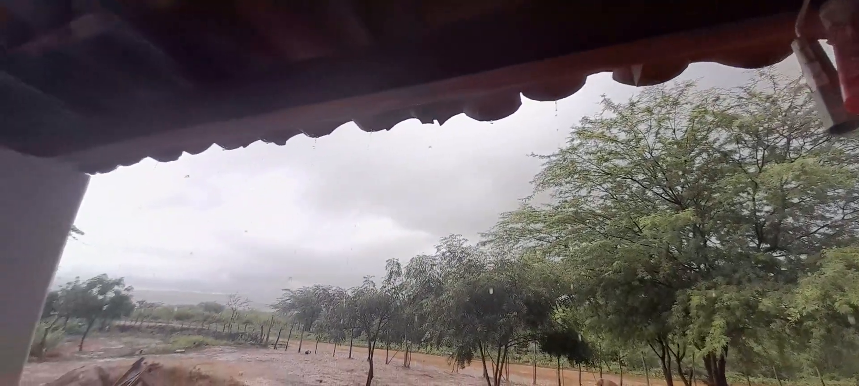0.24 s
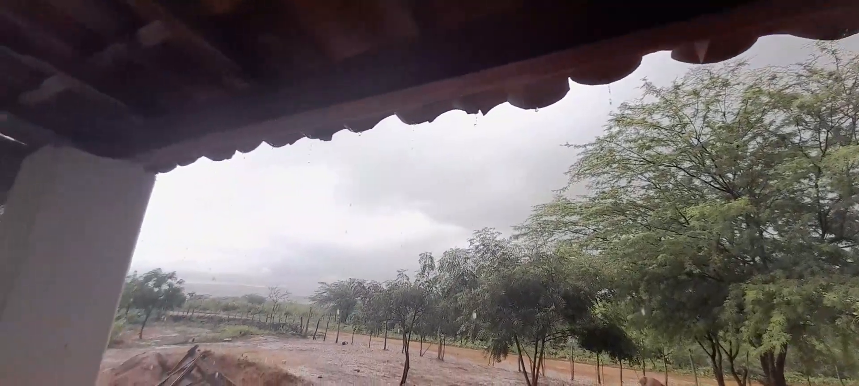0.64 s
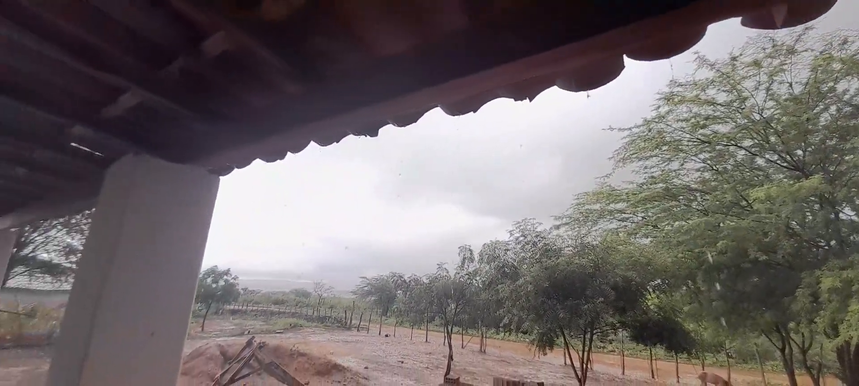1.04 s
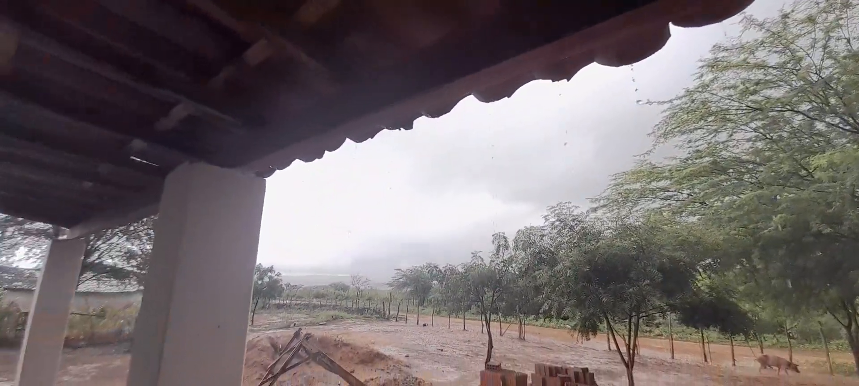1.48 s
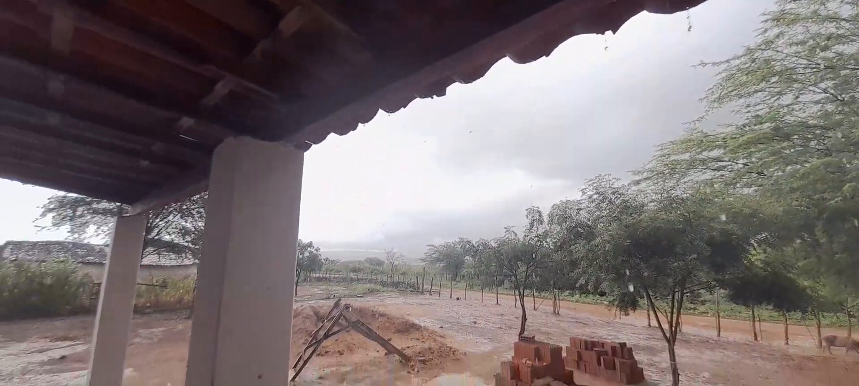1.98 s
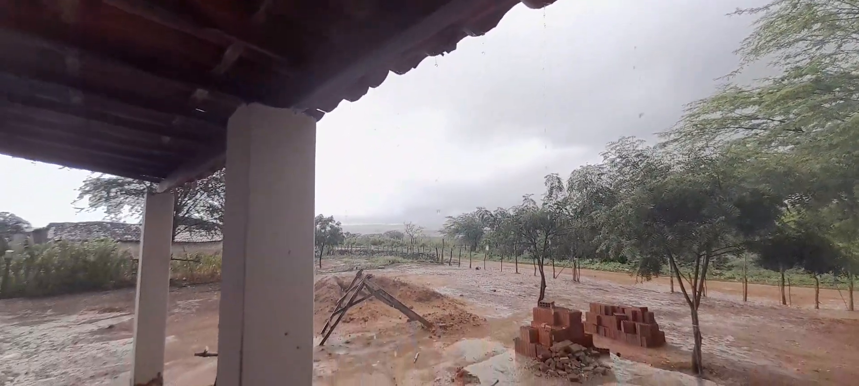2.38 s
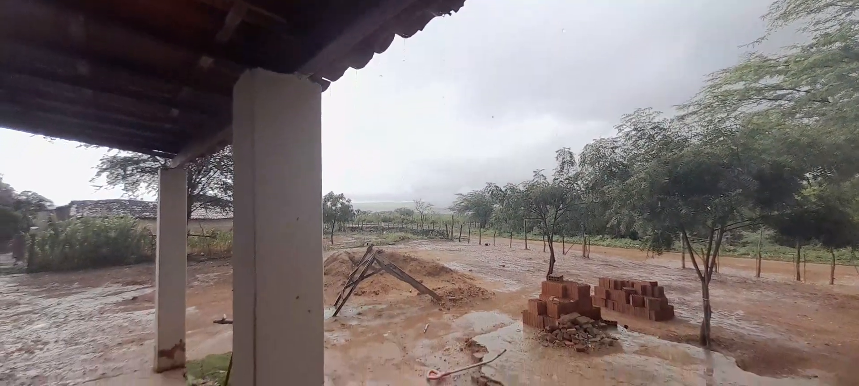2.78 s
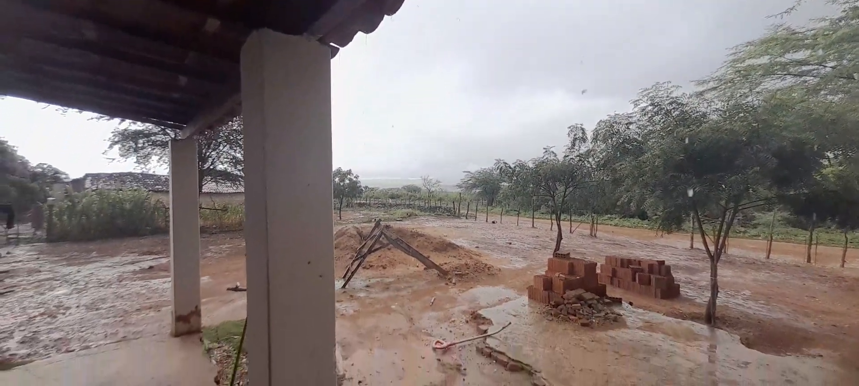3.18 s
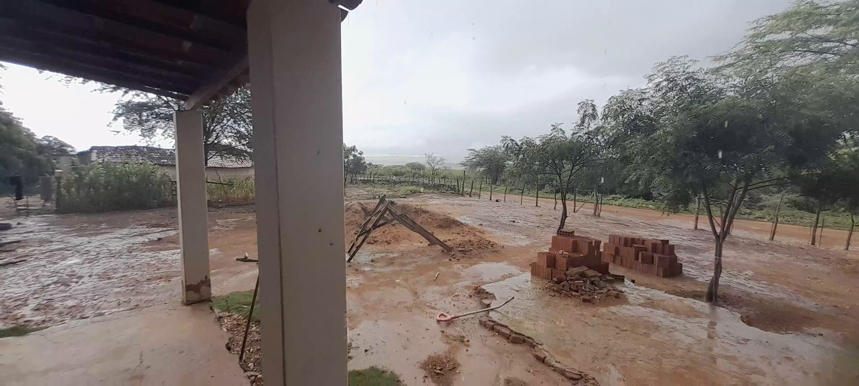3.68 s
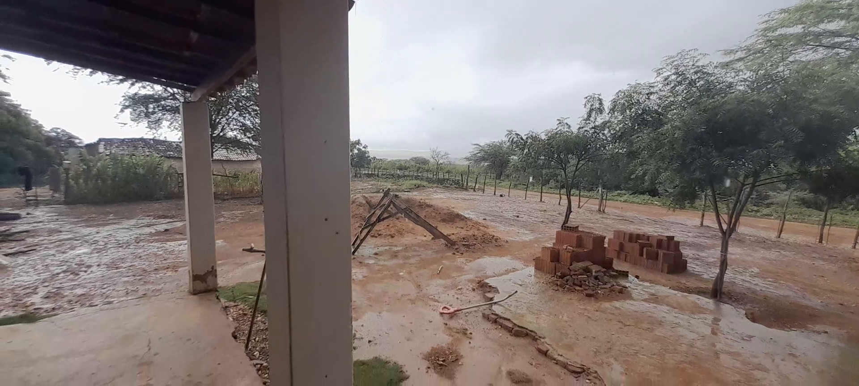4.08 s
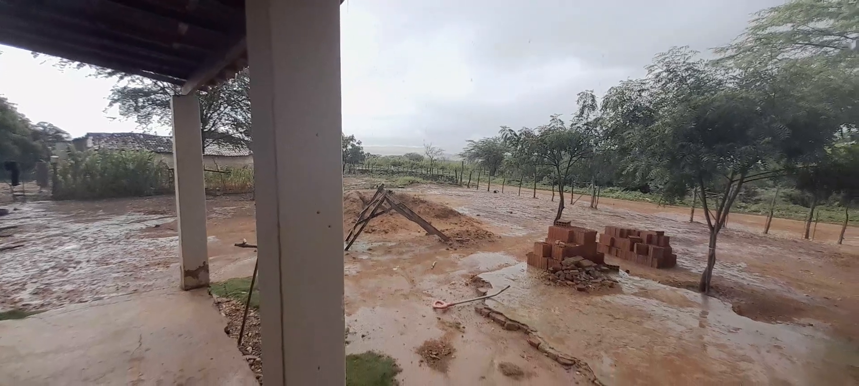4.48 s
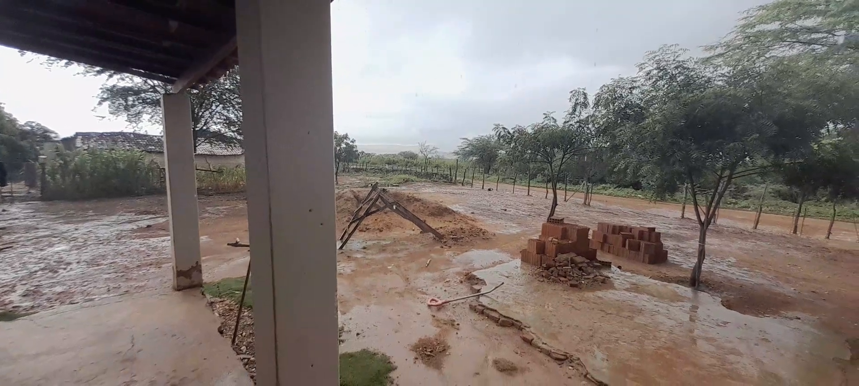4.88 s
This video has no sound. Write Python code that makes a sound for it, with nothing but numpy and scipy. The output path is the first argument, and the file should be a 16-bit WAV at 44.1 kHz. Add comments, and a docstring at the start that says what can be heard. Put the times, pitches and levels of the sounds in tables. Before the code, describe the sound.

From under a tiled porch, steady thin rain and crisp irregular drips spatter a wet yard; a foot scrapes gritty floor twice.

```python
"""A bare yard in light rain, heard from under a tiled porch roof through a small pair of microphones.
Banded noise makes the rain hiss of wavering level and a dull roof wash; small drops patter as brief resonances.
Eave drips strike wet ground as plink, spray and plop, and ring back from the porch; rising sines are bubble-like
bloops and narrow ticks at a footstep. Shoe scuffs are strokes of rough noise; far calls, perhaps of fowl, are
grainy sines with a thin whistle, and a low rumble is resonant noise."""
import sys
import numpy as np
from scipy import signal
from scipy.fft import rfft, irfft, next_fast_len
from scipy.io import wavfile

SR = 44100
rng = np.random.default_rng(int(sys.argv[2]) if len(sys.argv) > 2 else 0)


def digitize_waveform(pressure):
    """Quantize a signal to 16-bit integers and store it at the path in sys.argv[1].

    Rows of a 2-D input are taken as channels; values are limited to [-1, 1].
    """
    field = np.atleast_2d(pressure).T
    bounded = np.clip(field, -1, 1)
    quanta = np.round(bounded * 32767).astype(np.int16)
    wavfile.write(sys.argv[1], SR, quanta)


N = 226909
LEFT_LAG_S = 0.00027   # usual delay of the left port
SPOTS = 4   # places under the eave where water lands

# levels over time: [t/s, bright hiss/dB, dull roof wash/dB, patter/dB]
LAYER_LEVELS = [(0.0, -49, -67, -67), (0.08, -53, -67, -59.5), (0.56, -51.5, -68, -58),
                (0.97, -51.5, -66.5, -57.5), (1.12, -56, -66, -61), (1.49, -50, -65.5, -54),
                (1.62, -52, -69, -57.5), (1.8, -53, -62, -61.5), (2.06, -56, -69.5, -56.5),
                (2.19, -49, -64.5, -59), (2.55, -56.5, -67.5, -55), (2.68, -51.5, -67.5, -56),
                (3.18, -53, -67, -60), (3.25, -53, -66.5, -68), (3.38, -54, -68.5, -50.5),
                (3.51, -56.5, -65.5, -61), (4.01, -54.5, -66, -58), (4.38, -57, -71, -59),
                (4.55, -54, -67.5, -57), (4.71, -56, -70, -57), (4.85, -55.5, -62.5, -58),
                (5.14, -55.5, -71, -57)]


def from_db(db):
    """Gain of a level in dB."""
    return 10 ** (np.asarray(db) / 20)


def rms_one(x):
    """Scaled to rms 1."""
    return x / np.sqrt(np.mean(x ** 2) + 1e-20)


def in_time(rows):
    """Curve columns at every sample."""
    s, *columns = np.transpose(rows)
    return [np.interp(np.arange(N) / SR, s, c) for c in columns]


def at_hz(points, hz):
    """A spectrum read on a log frequency axis."""
    point_hz, values = np.transpose(points)
    return np.interp(np.log(hz), np.log(point_hz), values)


def drift(rate):
    """Slow chance with spread 1: noise through two equal low-passes at rate Hz, drawn every 40 samples."""
    r = np.exp(-80 * np.pi * rate / SR)
    slow = signal.lfilter([1], [1, -2 * r, r * r], rng.standard_normal(N // 40 + 2002))[2000:]
    return np.interp(np.arange(N) / 40, np.arange(len(slow)), rms_one(slow))


def swell(s, length, rise=0.44):
    """A rounded rise and fall of height 1; rise is the share of the length spent rising."""
    u = (np.arange(N) / SR - s) / length
    ramp = np.minimum(u / rise, (1 - u) / (1 - rise))
    return np.sin(np.pi / 2 * np.clip(ramp, 0, 1)) ** 2


def resonance(x, hz, width_hz):
    """A two-pole peak of gain 1."""
    r = np.exp(-np.pi * width_hz / SR)
    poles = [1, -2 * r * np.cos(2 * np.pi * hz / SR), r * r]
    return signal.lfilter([(1 - r * r) / 2, 0, (r * r - 1) / 2], poles, x)


def double_resonance(x, hz, width_hz):
    """The same peak twice in series, for steeper sides and a rounder onset; rms 1."""
    return rms_one(resonance(resonance(x, hz, width_hz), hz, width_hz))


def tone(hz, rough_db, wobble_hz=28, rate=60):
    """A wavering, grainy sine on a pitch track, rms near 1; the wobble shrinks below 1200 Hz."""
    wobble = wobble_hz * drift(rate) * np.minimum(hz / 1200, 1)
    grain = from_db(rough_db * drift(115))
    return np.sqrt(2) * grain * np.sin(2 * np.pi * np.cumsum(hz + wobble) / SR)


def banded_noise(spectrum, patchy_db, together_db, rate):
    """Quarter-octave stereo noise bands, each with its own level, flicker and left-right likeness; rms 1."""
    # how alike the two ports are: [f/Hz, correlation]
    likeness = [(60, -0.13), (180, 0.64), (550, 0.66), (1650, -0.12), (4970, 0.12), (15000, -0.054)]
    out, together = 0, drift(rate)
    low_end, high_end = spectrum[0][0], min(spectrum[-1][0], 19000)
    edges = np.exp(np.arange(np.log(low_end), np.log(high_end), np.log(2) / 4))
    white = rng.standard_normal((2, 2, N))      # neighbouring bands get unrelated noise
    for k, (low, high) in enumerate(zip(edges, edges[1:])):
        band = signal.butter(2, [low, high], "band", fs=SR, output="sos")
        mid, side = signal.sosfilt(band, white[k % 2])
        hz = np.sqrt(low * high)
        alike = at_hz(likeness, hz)
        gain = from_db(at_hz(spectrum, hz) + together_db * together + patchy_db * drift(rate))
        out = out + gain * (np.sqrt(1 + alike) * mid + np.sqrt(1 - alike) * side * [[1], [-1]])
    return rms_one(out)


def place(x, pan_db=0, lag_s=LEFT_LAG_S):
    """A source to one side: a level step between the ports, and the left one late if lag_s is above 0."""
    lag = int(round(lag_s * SR))
    left = np.pad(x, (max(lag, 0), 0))[:len(x)]
    right = np.pad(x, (max(-lag, 0), 0))[:len(x)]
    return np.array([left, right]) * from_db([[pan_db / 2], [-pan_db / 2]])


def far_hiss():
    """Far rain: bright noise in bands; the hiss wavers in level, all bands together and each alone."""
    # colour of the hiss: [f/Hz, level per Hz/dB]
    hiss_colour = [(530, -12), (900, -6.5), (1520, -4.5), (2030, 2.5), (2980, -7), (4750, -5.5),
                   (7390, 1.5), (7940, 6.5), (9160, -31), (11200, 6), (13800, -4), (17100, 1)]
    hiss_db, _, _ = in_time(LAYER_LEVELS)
    return from_db(hiss_db) * banded_noise(hiss_colour, patchy_db=2.2, together_db=2.2, rate=16.0)


def roof_wash():
    """Rain on the roof: dull noise in bands, of wavering level."""
    # colour of the wash: [f/Hz, level per Hz/dB]
    wash_colour = [(65, -44), (110, -5.5), (231, -3.5), (466, -3), (573, -2.5), (958, -16.5), (1210, -2.5),
                   (1500, -20), (1950, -81), (3300, -120)]
    _, roof_db, _ = in_time(LAYER_LEVELS)
    return from_db(roof_db) * banded_noise(wash_colour, patchy_db=2.0, together_db=3.5, rate=17.7)


def patter(per_s, cycles):
    """Small drops land at random, each ringing a few cycles at a random pitch; direct sound and spots."""
    # strength of the drops by pitch: [f/Hz, level/dB]
    patter_colour = [(1500, -20), (2500, -7), (4500, -1), (7500, 2), (9500, -6), (14000, 3)]
    _, _, patter_db = in_time(LAYER_LEVELS)
    sizes = from_db(4 * np.minimum(rng.exponential(1, N), 3)) * rng.choice([-1, 1], N)
    born = rng.random(N) < per_s * from_db(2.5 * drift(10)) / SR
    pitches, dealt = np.geomspace(1600, 15500, 16), rng.integers(0, 16, N)
    rings = []
    for k, hz in enumerate(pitches):
        blows = sizes * born * (dealt == k) + 1e-18
        rings.append(from_db(at_hz(patter_colour, hz)) * double_resonance(blows, hz, hz / cycles))
    spots = rms_one(np.array([sum(rings[k::SPOTS]) for k in range(SPOTS)]))
    spots = from_db(patter_db) * spots / 2      # four unrelated spots sum to rms 1 before the level
    lags = np.linspace(-.5, 1.5, SPOTS) * LEFT_LAG_S
    return sum(place(x, 0, lag) for x, lag in zip(spots, lags)), spots


def rumble():
    """Noise in two low resonances, mostly alike in both ports, which swells now and then."""
    # steady level of the lower mode: [t/s, level/dB]
    steady_level = [(0, -71), (.9, -66.5), (1.7, -70.5), (2.5, -73.5), (3.6, -74.5), (5.15, -76.5)]
    # the two resonances: [f/Hz, width/Hz]
    low_modes = [(64, 19.5), (96, 46)]
    # added swells: [t/s, length/s, lower mode level/dB, upper mode level/dB]
    low_swells = [(1.16, 0.093, -82, -77), (1.358, 0.21, -69, -55.5), (2.546, 0.13, -72, -82),
                  (3.092, 0.16, -71, -75), (3.298, 0.17, -71, -71), (3.498, 0.48, -70, -75),
                  (4.122, 0.23, -77, -68.5), (4.874, 0.27, -67, -68)]
    upper_db = -5   # steady level of the upper mode against the lower
    out, steady = 0, from_db(in_time(steady_level)[0])
    for k, (hz, width) in enumerate(low_modes):
        swells = sum(from_db(db[k]) * swell(s, length) for s, length, *db in low_swells)
        level = steady * from_db(k * upper_db) + swells
        mid, side = rng.standard_normal((2, N))
        ports = mid + .4 * side * [[1], [-1]]
        out = out + level * double_resonance(ports, hz, width)
    return out


def whistle():
    """A thin far whistle: one wavering sine that rises, holds and fades."""
    hold_s, end_s = (.55, .8), 1.2
    hold_db, rise_db_per_s, fall_db_per_s = -66, 40, 32
    t = np.arange(N) / SR
    slope = np.where(t < hold_s[0], rise_db_per_s, fall_db_per_s)
    fade_db = slope * np.abs(t - np.clip(t, *hold_s))
    level = from_db(hold_db - fade_db + 1.2 * drift(9.0)) * np.clip((end_s - t) / 0.14, 0, 1)
    return level * tone(2075 + 0 * t, rough_db=4, wobble_hz=7, rate=20)


def clucks():
    """Far calls, perhaps of fowl: two rough tones whose pitch arches up midway."""
    # the calls: [t/s, level/dB]
    cluck_times = [(0.447, -60), (.9, -63), (1.248, -64)]
    length_s, pitch_rise = 0.083, 0.0123   # the rise is a share of the pitch
    cluck_tones = [(1115, -4.5), (1350, -1)]   # [f/Hz, level/dB]
    arch = sum(swell(s, length_s) for s, db in cluck_times)
    voice = sum(from_db(db) * tone(hz * (1 + pitch_rise * arch), rough_db=3) for hz, db in cluck_tones)
    return voice * sum(from_db(db) * swell(s, length_s) ** .5 for s, db in cluck_times)


def glides():
    """Faint lone tones, thin chirps, a low hum, a footstep's thump and a second whistle: gliding sines."""
    # the glides: [t/s, length/s, start f/Hz, end f/Hz, level/dB]
    lone_tones = [(-.3, 1.6, 63.5, 64.5, -69), (-.05, .3, 1985, 1985, -71), (.32, .2, 1970, 1990, -71),
                  (.62, .095, 5600, 6020, -63), (1.34, .11, 185, 190, -66), (1.41, .12, 100, 94, -57.5),
                  (4.86, .09, 5700, 5980, -67), (4.99, .045, 2950, 2980, -64),
                  (5.095, .07, 2030, 2050, -62)]
    t, out = np.arange(N) / SR, 0
    for s, length, start_hz, end_hz, db in lone_tones:
        pitch = np.interp(t, [s, s + length], [start_hz, end_hz])
        out = out + from_db(db) * swell(s, length) ** .5 * tone(pitch, rough_db=1.5)
    return out


def faint_tones():
    """All the faint pitched sounds from one bearing, a little to the right."""
    return place(whistle() + clucks() + glides(), -2.0, lag_s=0)


def drips(plink_width, spray_width_hz, plop_hz, plop_width_hz, splash_s):
    """Impact and short splash ring three broad resonances: plink, spray, plop; direct sound and spots."""
    # clearest drips from the eave: [t/s, peak level/dB, plink f/Hz, spray f/Hz, plink share/dB,
    # spray share/dB, plop share/dB, left-right/dB, echo level against the drip/dB]
    eave_drips = [(0.0583, -34, 3000, 15300, 10, -14, -23, -1, -16),
                  (0.0954, -36, 7500, 13900, -18, -11, -30, -9, 7),
                  (0.1514, -33, 6700, 13900, -11.5, -9, -32, 0, 6),
                  (0.187, -28.5, 8000, 13500, -36, -8, -34, -5.5, 6.5),
                  (0.3414, -27, 7800, 15700, -13, -5.5, -30, -9, 8.5),
                  (0.407, -27, 8300, 13400, -9, -12, -28, 1, 0.5),
                  (0.4264, -29, 7800, 13100, -11, -5, -34, 0, 9),
                  (0.4848, -27, 7160, 15600, -9, -9, -26, -7, -1),
                  (0.5145, -34.5, 6230, 13200, -7, -17, -17, -5, 3.5),
                  (0.5327, -37, 6600, 13700, -16, -5, -25, -5.0, -1),
                  (0.5663, -21.5, 8200, 12100, -30, 2, -17, 3, -12),
                  (0.7334, -18, 5250, 14900, -12, -19, -8, 3.5, -1.5),
                  (0.763, -36, 7500, 14100, -22, -3, -32, -5, 9),
                  (0.8607, -29.5, 7040, 13500, -13, -21, -40, -14, -16),
                  (1.037, -32.5, 7800, 13900, -16, -10, -38, -18, -9),
                  (1.071, -32.5, 7690, 14400, -12, -3, -33, -2.5, 2),
                  (1.0914, -33, 8300, 15600, -7, -8, -13, 7, 10.5),
                  (1.2376, -22.5, 8200, 14400, -8, -7, -32, -2, 1),
                  (1.3054, -29, 6800, 14900, -29, -12, -23, -4, -3),
                  (1.3299, -37.5, 6580, 13500, -10, -12, -13, -14, -1),
                  (1.3683, -32, 7140, 13300, -7, -8, -16.5, -2, 8),
                  (1.4401, -26, 7000, 13800, -11, -13, -16, -2, 1),
                  (1.5325, -29.5, 7500, 13600, -15, -11, -21, -3.5, 6),
                  (1.6462, -41, 6000, 14600, -12, -22, -29, -10, -15),
                  (1.6856, -33.5, 7700, 12400, -7, -10, -22, -1, 9.5),
                  (1.734, -29.5, 4530, 14000, -24, -10, -18.5, 5, 3),
                  (1.8196, -34, 6600, 15700, 1, -16, -27, -3.0, -13),
                  (1.8372, -23.5, 6360, 13200, -11.5, -18.5, -27, -3, -2),
                  (1.9579, -30.5, 6100, 13900, -13, -23, -37, -3, -2.5),
                  (2.0538, -14, 7700, 11500, -10, 3, -24, -4, -0.5),
                  (2.156, -32, 4660, 11200, -6, -24, -7, -1, 1),
                  (2.171, -31.5, 8200, 12000, -7, -20, -28, -3, 7.5),
                  (2.2119, -40, 8090, 13200, -11, 4, -26, -4.0, -5),
                  (2.2234, -20.5, 7180, 13800, -24, -3, -44, -3, -1),
                  (2.3324, -42, 6600, 13200, -2, -15, -16, -15, -10),
                  (2.4, -36, 7600, 13500, -18, -1, -24, -8, -5),
                  (2.4376, -30, 7450, 15200, -9, -2, -34, 1, 7),
                  (2.4793, -27.5, 6750, 13600, -1, -7, -22, -8, -1),
                  (2.508, -34, 7500, 14800, -25, -8, -32, -10, -7),
                  (2.514, -29, 7050, 14600, -15, -12, -32, -14, 4),
                  (2.5346, -34.5, 4360, 14500, -12, -5, -1.5, -8, 9.5),
                  (2.5591, -30.5, 3940, 11100, -13, -8, -32, -15, 6.5),
                  (2.6319, -28.5, 7800, 15500, -12, -7, -28, -6, 6.5),
                  (2.7222, -24, 7500, 15800, -17, -11, -24, -5, -2),
                  (2.798, -31, 7700, 14400, -8, -12, -17.5, 5, 6.5),
                  (2.8155, -31.5, 7460, 13300, -8, -19, -29, -4, 6),
                  (2.8634, -28, 7300, 13600, -20, -5, -30, 5, 3),
                  (2.8929, -16, 5400, 14000, -4, -7.5, -19, -5.5, -5),
                  (2.918, -35, 6800, 14300, -8, -10, -32, -7, -4),
                  (2.9537, -33.5, 7180, 13400, -9.5, -20, -11, -13, -5),
                  (3.0278, -36.5, 6760, 13700, -15, -13.5, -20, 2, 9.5),
                  (3.0849, -34, 7700, 13900, -23, -5, -20, -8, -12),
                  (3.23, -18, 9000, 13900, -11, -9.5, -26, -2, -2.5),
                  (3.3584, -14.5, 5500, 14300, -3, -8.5, -14.5, -2.5, -13),
                  (3.3635, -27.5, 4150, 14300, -8, -14, -7.5, -1, 0.5),
                  (3.3768, -29, 6250, 13500, -1, -8, -20, -2, -2.5),
                  (3.4491, -40.5, 7800, 14400, 0, -25, -31, -21, -15),
                  (3.5354, -32, 7700, 14100, -8.5, -7.5, -20.5, -5, 2),
                  (3.5962, -26, 6630, 13050, -14.5, -12.5, -17.5, -1, -1),
                  (3.6242, -29, 7560, 14300, -13, -12, -26, -6.5, 5),
                  (3.6469, -30, 6630, 14300, -2, 0.5, -11, -5, 5.5),
                  (3.672, -11.5, 6660, 13300, -2.5, -9.5, -15, -3.5, -4),
                  (3.6765, -24.5, 3810, 13600, -9.5, -12, -22, -1, 2),
                  (3.7207, -21, 6600, 12000, -7, -2.5, -18, 3, 2),
                  (3.735, -27, 4450, 13500, -13, -3, -19, -10, 2),
                  (3.8751, -35.5, 6400, 13900, -15, -16, -32, -4, 10),
                  (3.932, -24.5, 7500, 15500, -28, -14.5, -29.5, -9.5, 4.5),
                  (3.9835, -33.5, 6630, 14400, -8, -21, -22, -14.5, -8),
                  (4.0881, -40, 6500, 15600, -7, -8, -15, 0, 8),
                  (4.2057, -29.5, 7600, 15400, -4.5, -7, -13, -2, 5),
                  (4.2665, -34, 7000, 14000, -11, -28, -30, -3, 3),
                  (4.371, -29, 6560, 13800, -16, -19.5, -37, -3, -7),
                  (4.4235, -32, 7200, 14200, -8.5, -11, -14, -1, -5),
                  (4.48, -39, 7760, 13300, -10, -14, -32, -11, 3),
                  (4.4957, -40.5, 7700, 14700, -8, -13, -36, -7, 12),
                  (4.506, -33, 7950, 14000, -4, -22, -36, -4, 0),
                  (4.5185, -37, 4100, 14000, -4, -22, -32, 0, -5),
                  (4.578, -25, 5190, 14600, -20, -13, -40, -1, -3),
                  (4.591, -32.5, 10500, 12000, -5, -14, -28, -2, 9),
                  (4.5999, -32.5, 8000, 11500, -5, -12, -19, 3, 7.5),
                  (4.7027, -38, 8190, 13400, -8, -10, -28, -1, -3),
                  (4.735, -32, 10600, 13400, -6, -7, -33, 0, 10),
                  (4.7505, -35, 6100, 13400, -7, -22, -12.5, -7, 4.5),
                  (4.8087, -32.5, 6500, 15100, -10, -11, -30, -12, 0),
                  (4.8452, -30, 8000, 11500, -4, 0, -25, -6, 3.5),
                  (4.9097, -28.5, 7700, 14700, -9, -4.5, -44, -7, 6),
                  (4.9796, -25, 6400, 13700, 4, -7.5, -7.5, -4, 0.5),
                  (5.029, -31, 6060, 15600, -10, -16.5, -12, -6, -3),
                  (5.0691, -23, 5800, 15400, -20.5, -11, -33, -2, 0)]
    widening = 0.29   # dB of plink width gained per dB of peak level
    t = np.arange(600) / SR
    direct, spots = np.zeros((2, N + len(t))), np.zeros((SPOTS, N + len(t)))
    grit, bearing = rng.standard_normal((len(eave_drips), len(t))), rng.random(len(eave_drips))
    for k, row in enumerate(eave_drips):
        s, peak_db, hz, spray_hz, plink_db, spray_db, plop_db, pan_db, echo_db = row
        blow = (t == 0) + 0.2 * grit[k] * np.exp(-t / splash_s)
        plink_width_hz = hz * plink_width * from_db(widening * (peak_db + 14.0))
        plink = from_db(plink_db) * double_resonance(blow, hz, plink_width_hz)
        spray = from_db(spray_db) * double_resonance(blow, spray_hz, spray_width_hz)
        plop = from_db(plop_db) * double_resonance(blow, plop_hz, plop_width_hz)
        drip = plink + spray + plop
        drip = from_db(peak_db) * drip / np.abs(drip).max()
        at = int((s + .001) * SR)      # lands 1 ms after the listed time
        direct[:, at:at + len(t)] += place(drip, pan_db, LEFT_LAG_S * (0.54 + 0.68 * bearing[k]))
        spots[k % SPOTS, at:at + len(t)] += from_db(echo_db) * drip
    return direct[:, :N], spots[:, :N]


def porch(x):
    """Echoes between floor, wall and roof tiles, sparse at first, then dense; other ones in each port."""
    t60_s, extra_treble_t60_s, gap_s = 0.16, 0.06, 0.0019   # treble takes both decays
    early_share = 0.04   # how densely the first echoes come
    t = np.arange(SR // 3) / SR
    share = np.minimum(early_share + t / .06, 1)
    sparse = rng.random((2, len(t))) < share
    tail = rng.standard_normal((2, len(t))) * sparse / np.sqrt(share)
    tail = tail * from_db(-60 * t / t60_s) * (t > gap_s)
    dull = signal.lfilter([.45], [1, -.55], tail)      # wet tiles and air take the treble from late echoes
    tail = dull + (tail - dull) * from_db(-60 * t / extra_treble_t60_s)
    tail = tail / np.sqrt(np.sum(tail ** 2, axis=1, keepdims=True))
    return signal.fftconvolve(x[None], tail, axes=1)[:, :N]


def short_rings():
    """Bubble-like bloops and two narrow ticks: decaying sines that climb in pitch; direct and porch shares."""
    # short ringing sounds: bubble-like bloops, and two narrow ticks near 4 kHz at the footstep:
    # [t/s, f/Hz, peak level/dB, echo against direct/dB, ring t60/s]
    ring_rows = [(1.2335, 1936, -36, -8.5, 0.016), (1.4401, 4260, -32.5, -14, 0.0078),
                 (1.443, 3930, -33, 3, 0.0055), (2.527, 2030, -45, 5.5, 0.036),
                 (2.5342, 1990, -44, 1, 0.023), (3.529, 1730, -42.5, 3.5, 0.018),
                 (3.757, 3160, -47.5, -8, 0.034), (4.999, 2270, -46.5, -2.5, 0.057),
                 (5.036, 3480, -45.5, -2, 0.016), (5.114, 1960, -51.5, 4, .06)]
    rise_per_s = 6   # share of the starting pitch gained each second
    out = 0
    for s, hz, db, echo_db, t60 in ring_rows:
        t = np.maximum(np.arange(N) / SR - s, 0)
        decay = from_db(db - 60 * np.minimum(t / t60, 4))
        ring = decay * np.sin(2 * np.pi * hz * t * (1 + rise_per_s * t / 2))
        out = out + ring * from_db([[0], [echo_db]])
    return out


def shoe():
    """Grit dragged under the sole: rough noise under each stroke."""
    # strokes over the floor: [t/s, length/s, level/dB]
    strokes = [(1.44, 0.2, -44.5), (1.703, 0.073, -51.5), (2.43, 0.22, -50), (2.597, 0.12, -52),
               (2.68, 0.12, -50.5)]
    # colour of the scuff: [f/Hz, level per Hz/dB]
    scuff_colour = [(410, -55), (700, -20), (975, -14.5), (1160, -6), (2220, -1.5), (2630, -11.5),
                    (3510, -7), (9000, -17.5), (11700, -13), (19800, -120)]
    press = 0.42   # share of the stroke spent pressing down
    stroke = sum(from_db(db) * swell(s, length, press) ** 0.5 for s, length, db in strokes)
    return stroke * banded_noise(scuff_colour, patchy_db=-1.5, together_db=1.5, rate=47)


def scene():
    """All sources; near drops also sound through the porch, each spot with echoes of its own."""
    rain = far_hiss() + roof_wash()
    small, small_spots = patter(per_s=640, cycles=2.6)
    direct, spots = drips(plink_width=0.62, spray_width_hz=6500, plop_hz=2590, plop_width_hz=2120,
                          splash_s=0.00058)
    echoes = sum(porch(x) for x in spots + from_db(-1.5) * small_spots)   # patter echoes 1.5 dB down
    rings, ring_echoes = short_rings()
    ringing = place(rings, -10.0) + porch(ring_echoes)
    return rain + small + direct + echoes + ringing + shoe() + rumble() + faint_tones()


def record(dry):
    """The microphones colour the treble, the two ports differ in colour, and the top is cut."""
    # treble colour of both microphones: [f/Hz, level/dB]
    mic_colour = [(1000, 0.5), (5000, 0.5), (7300, 1), (9600, -0.5), (12000, -0.5), (14300, 3.5)]
    # colour between the ports: [f/Hz, left-right/dB]
    port_colour = [(60, -3), (110, 1), (200, 2.5), (380, 3), (700, 6), (1290, 0), (2380, -3), (4400, -1),
                   (8120, -0.5), (15000, -5)]
    size = next_fast_len(N)
    hz = np.arange(size // 2 + 1) * SR / size + 1      # 1 Hz up, to keep the log finite
    colour = at_hz(mic_colour, hz) + at_hz(port_colour, hz) / [[2], [-2]]
    wet = irfft(rfft(dry, size) * from_db(colour), size)[:, :N]
    top_cut = signal.ellip(10, .5, 60, 15900, fs=SR, output="sos")      # steep low-pass at 15.9 kHz
    return signal.sosfilt(top_cut, wet)


dry = scene()
out = record(dry)
digitize_waveform(out)
```